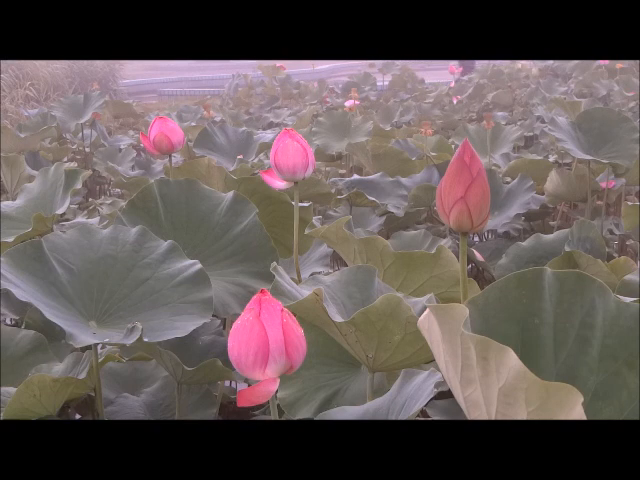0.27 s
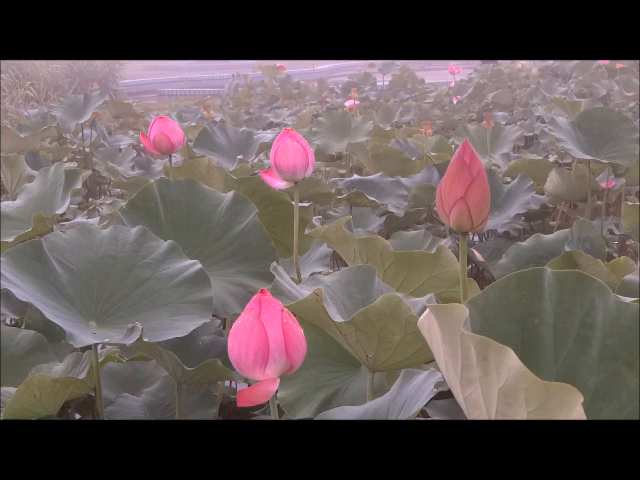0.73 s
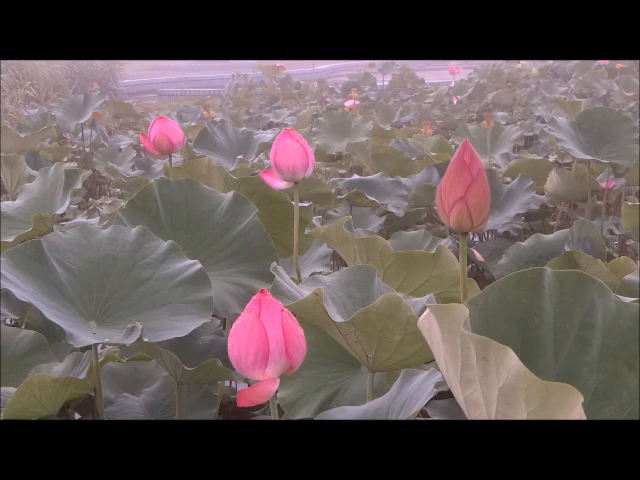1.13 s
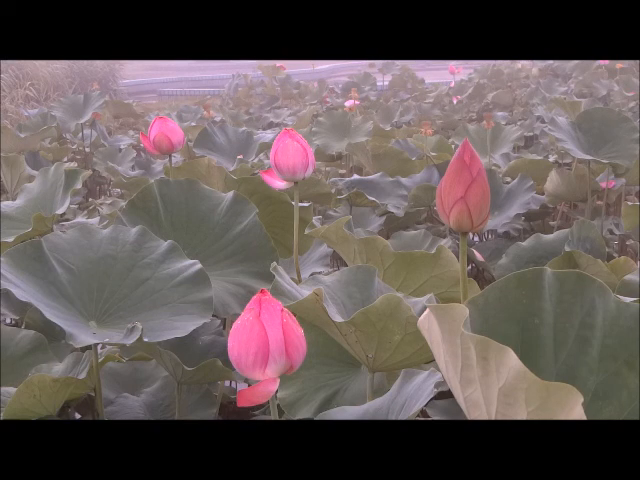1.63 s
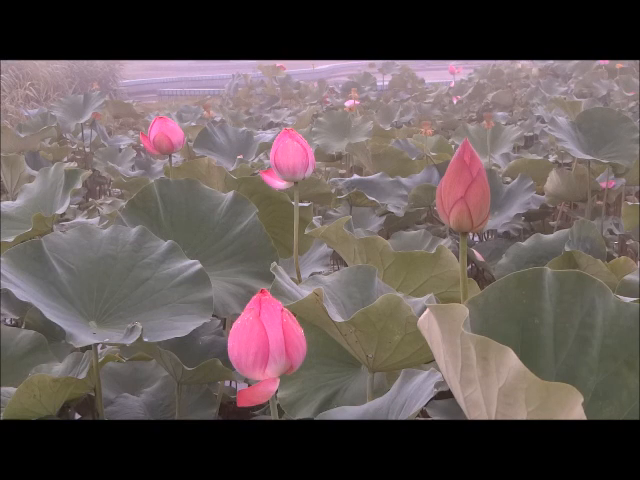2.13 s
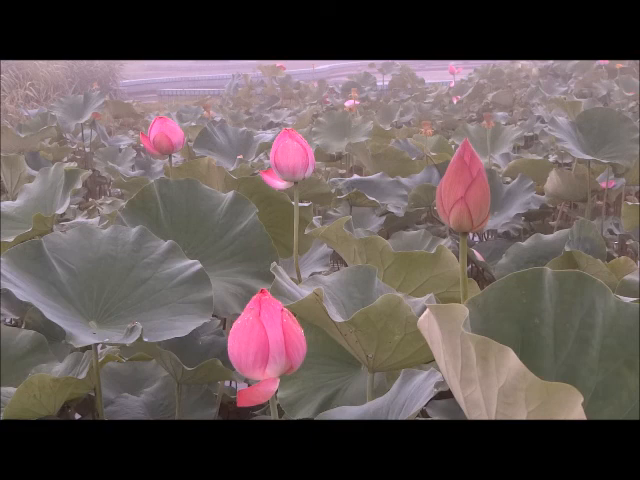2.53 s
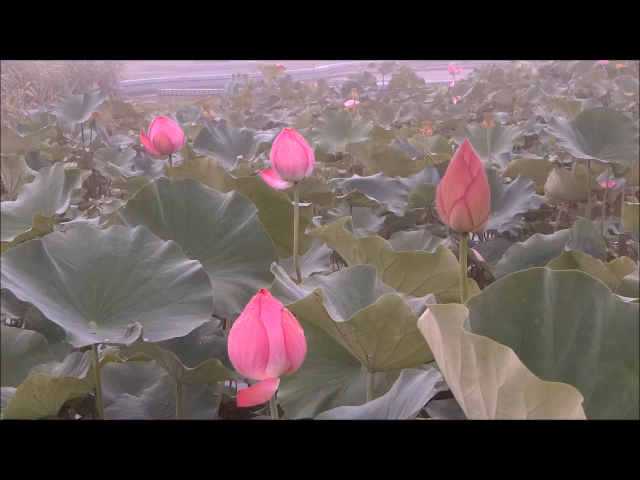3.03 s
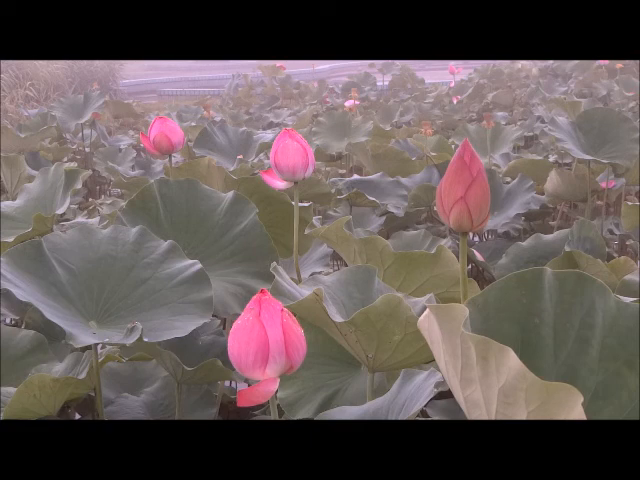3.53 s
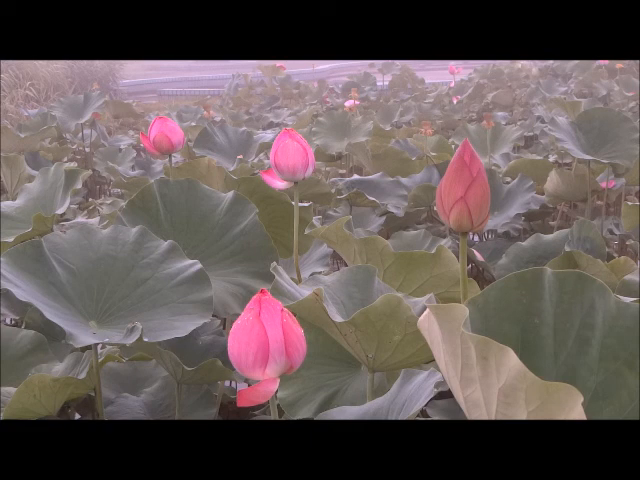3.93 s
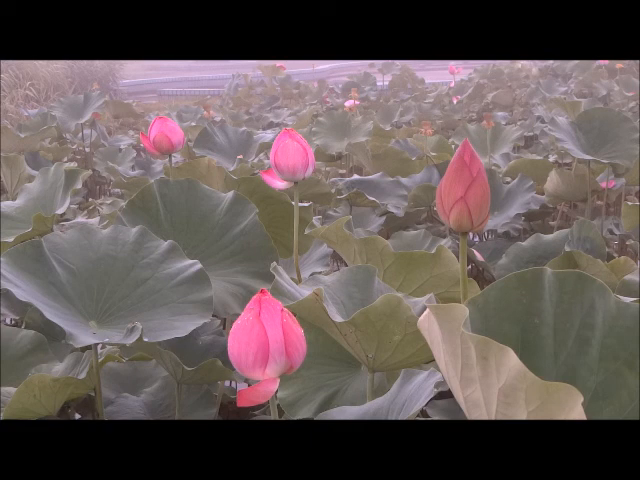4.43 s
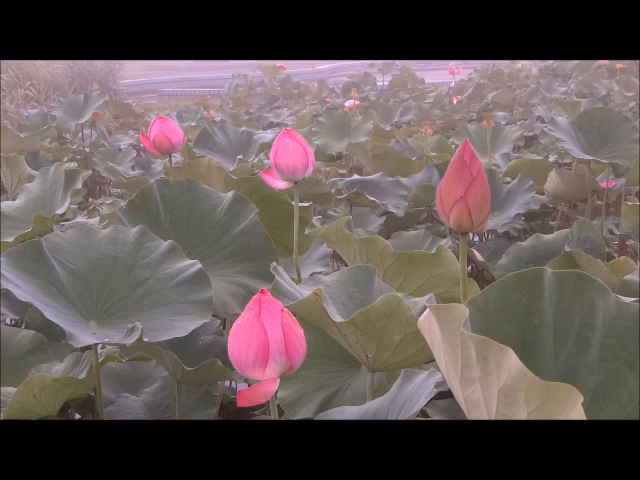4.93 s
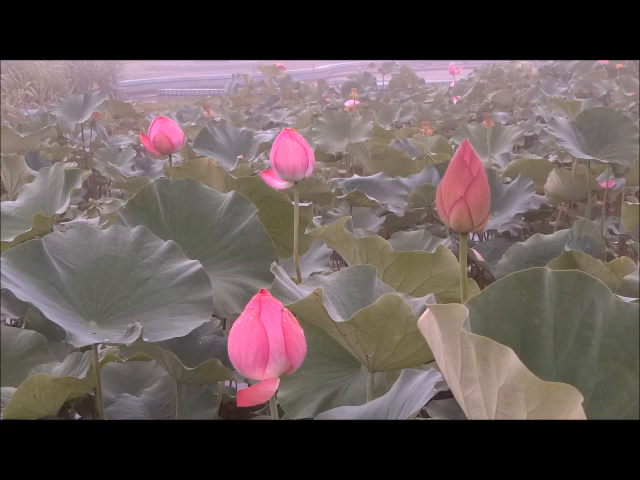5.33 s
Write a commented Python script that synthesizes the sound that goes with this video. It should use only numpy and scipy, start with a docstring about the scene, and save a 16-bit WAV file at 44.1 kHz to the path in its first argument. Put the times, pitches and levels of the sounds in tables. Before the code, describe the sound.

Steady high insect sizzle over a lotus pond while a reed bird sings scratchy chips, ticks and buzzes, with faint taps on leaves.

```python
"""A chorus of insects drones high and steady over a summer lotus pond, one near enough to buzz.
The chorus is shaped stereo noise; the near insect is a resonator rung by stroke pulses.
A warbler in the reeds sings scratchy, trilled phrases from pulsed, frequency-flicked tones.
Other birds whistle thin glides, and taps on the leaves are snaps plus decaying leaf modes.
Low shaped noise and wavering sines make a faint, far rumble; the reeds add a short tail."""
import sys
import numpy as np
from scipy import signal
from scipy.fft import rfft, irfft
from scipy.io import wavfile
from scipy.ndimage import uniform_filter1d

SR = 44100
rng = np.random.default_rng(int(sys.argv[2]) if len(sys.argv) > 2 else 0)


def to_wav(s):
    """Save 16-bit WAV."""
    ch = np.atleast_2d(s).T  # columns
    pcm = np.round(np.clip(ch, -1, 1) * 32767)  # PCM
    wavfile.write(sys.argv[1], SR, pcm.astype(np.int16))


N = 246078  # samples


def gain_of(db):
    """Decibels to amplitude."""
    return 10 ** (np.asarray(db) / 20)


def unit_rms(x):
    """Scales to an rms of 1 over all channels."""
    return x / np.sqrt(np.mean(x ** 2) + 1e-20)


def read(points, hz):
    """Interpolates a table linearly over log frequency."""
    f, value = np.transpose(points)
    return np.interp(np.log(hz + 1), np.log(f + 1), value)


def add(mix, t_s, sound):
    """Adds a stereo sound into the mix at t_s."""
    start = max(round(t_s * SR), 0)
    part = mix[:, start:][:, :sound.shape[1]]
    part += sound[:, :part.shape[1]]


def wander(rate_hz):
    """Random curve of rms 1: white noise under a Gaussian low-pass of about rate_hz."""
    f = np.fft.rfftfreq(N, 1 / SR)
    spectrum = rfft(rng.standard_normal(N)) * np.exp(-(f / rate_hz) ** 2)
    return unit_rms(irfft(spectrum, N))


def oscillate(hz):
    """Complex tone whose phase integrates the frequency curve hz."""
    return np.exp(2j * np.pi * np.cumsum(hz) / SR)


def place(sound, pan_db, lead_rad=0):
    """Sets an analytic sound between the ears by level and phase."""
    left = sound * gain_of(pan_db / 2) * np.exp(1j * lead_rad)
    right = sound / gain_of(pan_db / 2)
    return np.array([left, right]).real


# likeness of the two ears: f/Hz, coherence/0-1
EAR_COHERENCE = [(60, 0.99), (130, 0.99), (260, 0.66), (540, 0.085), (1130, 0.075), (2400, 0.25),
                 (5200, 0.65), (6400, 0.83), (7450, 0.68), (8900, 0.79), (10100, 0.63)]
# level of left over right: f/Hz, level/dB
EAR_BALANCE = [(1000, 0), (4200, 0.5), (5900, -4), (7100, 0), (7700, -2), (8400, -5), (9000, -1.5),
               (9900, 0)]
# phase by which the left ear leads: f/Hz, lead/rad
EAR_LEAD = [(1000, 0.069), (7500, -0.081), (9300, -0.63), (10200, -0.03)]


def diffuse(spectrum, patchy_db):
    """Countless far sources blended: unit-rms stereo noise with drifting patches of loudness."""
    frames, hz = N // 512 + 5, np.fft.rfftfreq(2048, 1 / SR)
    a, b, c, d, patches = rng.standard_normal((5, frames, len(hz)))
    patches = uniform_filter1d(patches, size=9, axis=0)  # over time
    patches = unit_rms(uniform_filter1d(patches, size=24, axis=1))  # over frequency
    coherence = np.clip(read(EAR_COHERENCE, hz), -1, 1)
    left = a + 1j * b
    right = coherence * left + np.sqrt(1 - coherence ** 2) * (c + 1j * d)
    lean = gain_of(read(EAR_BALANCE, hz) / 2)
    z = np.array([left * lean * np.exp(1j * read(EAR_LEAD, hz)), right / lean])
    z *= gain_of(read(spectrum, hz) + patchy_db * patches)
    noise = signal.istft(z.transpose(0, 2, 1), nperseg=2048, noverlap=1536)[1]
    return unit_rms(noise[:, :N])


# relative spectrum of the insect chorus: f/Hz, level per Hz/dB
CHORUS_SPECTRUM = [(5300, -28), (5750, -19.5), (6050, -13), (6400, -10.5), (6850, -12.5), (7300, -26),
                   (7750, -11), (8250, -5), (8900, 3), (9350, -1), (9580, -6), (9850, -14), (10280, -19.5),
                   (10800, -90)]


def chorus(level_db=-43, swell_db=0.31):
    """Ticks of many insects merge into a sizzle at their 9 kHz resonance, a weaker one near 6.4 kHz."""
    return gain_of(level_db + swell_db * wander(18)) * diffuse(CHORUS_SPECTRUM, patchy_db=0.67)


def near_insect(level_db=-52, stroke_hz=121, ring_hz=9495, width_hz=200, scatter=.3, drift_hz=23):
    """Nearly even strokes of differing strength set the insect's resonator ringing."""
    stroke_count = np.floor(np.cumsum(stroke_hz * (1 + .003 * wander(2))) / SR)
    strokes = np.diff(stroke_count, prepend=0)
    strokes = strokes * (1 + scatter * (rng.standard_normal(N) + 1j * rng.standard_normal(N)))
    push = signal.oaconvolve(strokes, signal.windows.hann(110), "same")  # 2.5 ms per stroke
    r = np.exp(-np.pi * width_hz / SR)
    envelope = signal.lfilter([1], [1, -r], push)
    ring = envelope * oscillate(ring_hz + drift_hz * wander(10))
    return gain_of(level_db) * unit_rms(place(ring, pan_db=-3.5, lead_rad=-1.1))


# relative spectrum of the open air and far rumble: f/Hz, level per Hz/dB
AIR_SPECTRUM = [(15, -19.5), (35, -8), (55, 0.5), (72, 4), (88, 0), (135, -3), (190, -6), (330, -15.5),
                (650, -16.5), (1300, -21.5), (2800, -26.5), (4600, -28.5), (8000, -33.5)]


def open_air(level_db=-54.5):
    """The far rumble and air: diffuse noise, strongest at low frequency."""
    return gain_of(level_db) * diffuse(AIR_SPECTRUM, patchy_db=1.5)


# tones of a far machine within the rumble: f/Hz, mean level/dB
HUM_TONES = [(53.5, -66.5), (67, -68.5), (124, -68), (1023, -85)]


def far_hum(waver_hz=1.0, fade_db=2.0):
    """Faint tones that waver and fade on their way across the fields."""
    hum = np.zeros(N)
    for hz, db in HUM_TONES:
        tone = unit_rms(oscillate(hz + waver_hz * wander(4.14)).imag)
        hum += gain_of(db + fade_db * wander(1.1)) * tone
    return hum


# Notes within one warbler syllable. Columns of every *_NOTES table:
# onset/share of syllable, length/share of syllable, level/dB re syllable, swell peak/0-1,
# pitch ratio at start, middle, end, pulse rate/Hz, roughness/0-1, flick depth/cycles, pulse sharpness/exponent
# chip: one rough note
CHIP_NOTES = [(0.0011, 0.99, 0, 0.6, 1.04, 1, .94, 330, 0.623, 1, 4.5)]
# rasp: one sagging note
RASP_NOTES = [(0, 1, 0, 0.57, 1.05, 1.02, .94, 255, 0.333, .6, 3.5)]
# tick: faint click, harsh burst, clear tail
TICK_NOTES = [(0, .23, -9.5, .35, 1, 0.91, 0.9, 498, 0.29, .9, 4),
              (.33, .41, -0.5, 0.72, .99, 0.97, 1, 479, 0.467, 0.946, 3.9),
              (.68, .32, -5, .15, .99, 1, .95, 480, .05, .15, 4)]
# churr: two beats, then a slow rattle
CHURR_NOTES = [(0, .28, -1.6, 0.98, 1.1, 1.04, 1.07, 266, 0.53, 0.694, 3.6),
               (.31, .22, 0.5, 0.45, 1.01, 1, 1.09, 267, 0.38, 0.72, 3),
               (.52, .46, -8, .17, 1.09, 1.1, 1.11, 170, .55, .78, 4)]
# tweet: fine trill that drops off clear
TWEET_NOTES = [(0, 0.96, 0, 1, 0.95, 0.98, 0.98, 311, 0.053, 0.71, 3),
               (.8, 0.25, -1.5, .15, .98, .93, 0.866, 315, .03, 0.11, 4)]
# see-saw: a fall, then an arch
SEESAW_NOTES = [(0, .42, -4, 0.24, 1.04, .87, .76, 167, 0.58, 0.923, 4.2),
                (.41, .59, 0, .67, .86, 1, .85, 208, .46, 0.99, 4.15)]
# scrape: one hoarse note
SCRAPE_NOTES = [(0, 1, 0, .5, 1.06, 0.99, .92, 303, 0.454, .8, 3.5)]
# buzz: high catch, then a nearly level drone
BUZZ_NOTES = [(0, .3, -4, 0.72, 1.17, 1.25, 1.19, 321, .22, .9, 4.2),
              (.2, .8, -0.5, 0.71, 1.01, 1, 1.025, 281.2, 0.108, 1.38, 1.48)]
# Syllables as sung; level and f are bases for the notes' offsets and ratios.
# low, sagging rasps: t/s, length/s, level/dB, f/Hz
RASP_TIMES = [(0, 0.025, -51, 2780), (0.157, 0.022, -50.5, 2730), (0.516, 0.062, -54, 2840),
              (.637, 0.098, -47.5, 2528), (0.953, .07, -54.5, 2810), (1.025, 0.017, -47, 2690),
              (1.047, 0.12, -46.5, 2583)]
# short, sharp chips: t/s, length/s, level/dB, f/Hz
CHIP_TIMES = [(0.019, 0.02, -45, 3400), (0.101, 0.02, -47, 2945), (.143, 0.017, -43.5, 3170),
              (.22, .017, -48.5, 3070), (.26, 0.019, -44.5, 3320), (.339, 0.017, -50.5, 3220),
              (.38, .019, -44.5, 3225), (0.458, 0.017, -49, 3090), (0.498, .021, -46, 3260),
              (.58, 0.024, -49.5, 3150), (0.608, 0.011, -51, 2900), (.622, .016, -44.5, 3470)]
# dry ticks in pairs: t/s, length/s, level/dB, f/Hz
TICK_TIMES = [(1.294, 0.04, -47, 3440), (1.368, 0.041, -47, 3460), (1.558, .039, -46.5, 3450),
              (1.632, 0.041, -47.5, 3390)]
# churrs: t/s, length/s, level/dB, f/Hz
CHURR_TIMES = [(1.99, 0.098, -49, 2300), (2.14, 0.086, -46.5, 2266), (2.291, .085, -47.8, 2267)]
# hoarse scrapes: t/s, length/s, level/dB, f/Hz
SCRAPE_TIMES = [(2.43, .05, -63, 4970), (2.517, 0.056, -61.5, 3250), (3.621, .024, -59, 3420),
                (3.643, .046, -49.5, 3145), (3.722, 0.02, -57.8, 3500), (3.744, .026, -49, 3400),
                (4.155, 0.035, -51.5, 3165), (4.691, 0.058, -56.5, 2970)]
# a single high tweet: t/s, length/s, level/dB, f/Hz
TWEET_TIMES = [(2.583, .06, -49, 3794)]
# a run of see-saw calls: t/s, length/s, level/dB, f/Hz
SEESAW_TIMES = [(2.919, 0.08, -49.5, 2935), (3.055, 0.088, -50, 2920), (3.195, 0.087, -49.5, 3040),
                (3.339, .089, -51, 3010), (3.476, 0.084, -51, 3010)]
# nasal buzzes: t/s, length/s, level/dB, f/Hz
BUZZ_TIMES = [(5.055, .073, -49, 2313), (5.167, 0.074, -48, 2290), (5.401, .077, -47.8, 2354),
              (5.521, 0.087, -47, 2280)]


def song_notes():
    """The warbler's notes: each syllable's shape stretched to its length and moved to its pitch."""
    song = [(RASP_NOTES, RASP_TIMES), (CHIP_NOTES, CHIP_TIMES), (TICK_NOTES, TICK_TIMES),
            (CHURR_NOTES, CHURR_TIMES), (SCRAPE_NOTES, SCRAPE_TIMES), (TWEET_NOTES, TWEET_TIMES),
            (SEESAW_NOTES, SEESAW_TIMES), (BUZZ_NOTES, BUZZ_TIMES)]
    for shape, syllables in song:
        for t_s, length_s, db, hz in syllables:
            for onset, share, note_db, peak, start, middle, end, *voice in shape:
                pitches_hz = (start * hz, middle * hz, end * hz)
                yield t_s + onset * length_s, share * length_s, db + note_db, peak, pitches_hz, *voice


def glide(u, pitches_hz):
    """Quadratic pitch arch through three values as the note's progress u runs from 0 to 1."""
    return np.polyval(np.polyfit([.18, .5, .82], pitches_hz, 2), u)


def warbler(harsh_hz=900, rasp_hz=420, uneven=0.4, flutter_db=5.0, pinch=0.49, edge=0.46,
            throat_hz=1750, reach_hz=600, rough_reach_hz=1000):
    """A whistle pulsed by the syrinx, which flicks its pitch; rough notes stumble, rasp and choke."""
    out = np.zeros((2, N))
    chance = np.array([wander(260), wander(1100), wander(350)])
    for t_s, length_s, db, peak, pitches_hz, rate_hz, rough, depth, sharp in song_notes():
        u = np.linspace(0, 1, max(round(length_s * SR), 64))
        at = round(t_s * SR) + np.arange(len(u))
        stumble, rasp, flutter = rough * chance.take(at, axis=1, mode="wrap")
        turns = np.cumsum(rate_hz * (1 + uneven * stumble)) / SR
        # each tightening flicks the tone upward by about depth cycles, more if rough: side tones spread
        tight = (np.sin(np.pi * turns) ** 2) ** sharp
        flick_hz = depth * tight * (rate_hz / tight.mean() + harsh_hz * rough)
        hz = glide(u, pitches_hz) + flick_hz + rasp_hz * rasp
        # in rough notes the tightening also chokes the tone
        pulses = 1 - np.clip(pinch * rough, 0, 1) * np.sqrt(tight)
        rise_fall = np.interp(u, [0, np.clip(peak, .05, .95), 1], [0, 1, 0])
        swell = np.sin(np.pi / 2 * rise_fall) ** edge
        note = swell * pulses * gain_of(flutter_db * flutter) * oscillate(hz)
        # the throat is tuned to each note and softens the side tones far above it
        top_hz = min(pitches_hz[1] + depth * reach_hz + rough * rough_reach_hz, SR / 2 - 1)
        note = signal.lfilter(*signal.butter(5, top_hz, fs=SR), note)
        add(out, t_s, gain_of(db) * unit_rms(place(note, pan_db=6.0, lead_rad=-0.45)))
    # the small throat passes little below its lowest resonance
    return signal.sosfilt(signal.butter(4, throat_hz, "high", fs=SR, output="sos"), out)


# whistles of farther birds: t/s, length/s, level/dB before trim_db, mid f/Hz, glide/octaves, left-right/dB
WHISTLE_NOTES = [(0.038, 0.034, -57.5, 1820, 0.18, -3), (.168, 0.038, -58, 5700, -.15, -6),
                 (.295, .044, -58, 5400, -.19, -4), (0.768, .032, -60, 5300, .12, -2),
                 (.808, .039, -55, 5380, -.29, -4), (1.042, .028, -57, 4230, .3, 4),
                 (1.252, .03, -54, 5320, -.25, -4), (2.21, .085, -64.5, 1860, -.02, -7),
                 (5.288, 0.013, -57.5, 4170, 1.1, 8), (5.310, .016, -56, 5120, -.2, 7),
                 (5.359, .042, -68, 2480, -.6, 0)]


def far_birds(trim_db=-4, quaver=.02):
    """Thin, nearly pure tones gliding in pitch under a half-sine swell."""
    out, waver = np.zeros((2, N)), wander(400)
    for t_s, length_s, db, mid_hz, octaves, pan_db in WHISTLE_NOTES:
        u = np.linspace(0, 1, round(length_s * SR))
        waver_now = waver[round(t_s * SR):][:len(u)]
        hz = mid_hz * 2 ** (octaves * (u - .5)) * (1 + quaver * waver_now)
        note = np.sin(np.pi * u) * oscillate(hz)
        add(out, t_s, gain_of(db + trim_db) * unit_rms(place(note, pan_db)))
    return out


# taps on the leaves: t/s, knock gain/dB, snap gain/dB, factor on leaf f, left-right/dB
LEAF_TAPS = [(0.211, -31.5, -44, 0.92, 10), (1.7237, -43, -26, 0.96, 6), (1.820, -48.5, -48, 1, 4),
             (3.4425, -35, -38.5, 0.91, -6.5), (3.510, -46, -50, 1, -6), (4.08, -43, -57, 2.08, 10),
             (4.503, -51, -79, 1.3, 8), (4.833, -49.5, -64, 2.16, -12)]
# modes of a struck leaf, before the tap's tuning: f/Hz, relative level/dB, t60/s
LEAF_MODES = [(577, -3, 0.024), (685, 0.5, 0.026), (930, 0, 0.0095), (1100, -10.5, 0.017),
              (1500, -6, 0.018), (1650, -11.5, .014), (2120, -8.5, .013)]


def taps(snap_hz=4000, snap_s=0.00061, echo_s=0.002406, echo=0.38, rustle_db=-15, rustle_t60_s=0.075,
         lowest_hz=420):
    """A short snap, the dull ring of the leaf, a little rustle, and a reflection off the water."""
    out, t = np.zeros((2, N)), np.arange(SR // 10) / SR
    rustle_band = signal.butter(2, [500, 4800], "band", fs=SR)
    for t_s, knock_db, snap_db, tuning, pan_db in LEAF_TAPS:
        knock = 0
        for hz, db, t60_s in LEAF_MODES:
            phase = hz * tuning * t + rng.random()  # smaller leaves ring higher
            knock = knock + gain_of(db - 60 * t / t60_s) * np.exp(2j * np.pi * phase) / 2
        snap_envelope = (t / snap_s * np.exp(1 - t / snap_s)) ** 2
        snap = snap_envelope * np.exp(2j * np.pi * snap_hz * t)
        noise = signal.lfilter(*rustle_band, rng.standard_normal(len(t)))
        rustle = signal.hilbert(unit_rms(noise)) * gain_of(rustle_db - 60 * t / rustle_t60_s)
        struck = gain_of(knock_db) * (knock + rustle) + gain_of(snap_db) * (snap + rustle / 2)
        tap = place(struck, pan_db)
        add(out, t_s, tap)
        add(out, t_s + echo_s, echo * tap)
    # a leaf radiates little below its lowest mode
    return signal.lfilter(*signal.butter(2, lowest_hz, "high", fs=SR), out)


# decay of the reed bed: f/Hz, t60/s
REED_DECAY = [(300, 0.63), (2500, 0.58), (8000, 0.052)]


def reeds(x, wet_db=-14):
    """Stems and leaves scatter a faint tail of sparse echoes, different at each ear."""
    echoes = rng.standard_normal((2, SR // 2)) * (rng.random((2, SR // 2)) < .05)
    hz, t, z = signal.stft(echoes, SR, nperseg=256)
    decay = gain_of(-60 * t / read(REED_DECAY, hz)[:, None])
    tail = signal.istft(z * decay, SR, nperseg=256)[1]
    tail = tail / np.linalg.norm(tail[0])
    return gain_of(wet_db) * signal.fftconvolve(x.mean(0)[None], tail, axes=1)[:, :N]


def scene():
    """Birds and taps among the reeds, over the insects and the far rumble."""
    calls = warbler() + far_birds() + taps()
    return chorus() + near_insect() + open_air() + far_hum() + calls + reeds(calls)


def record(dry, edge_hz=10750):
    """Linear-phase low-pass that limits the band."""
    low_pass = signal.firwin(511, edge_hz, window=("kaiser", 9), fs=SR)
    return signal.oaconvolve(dry, low_pass[None], "same")


dry = scene()
out = record(dry)
to_wav(out)
```